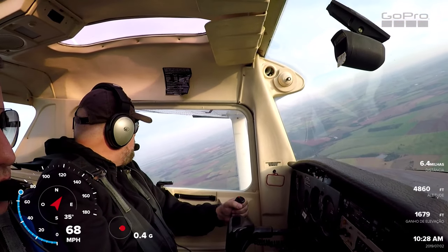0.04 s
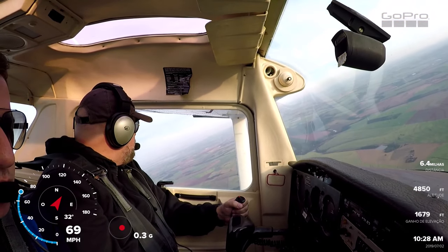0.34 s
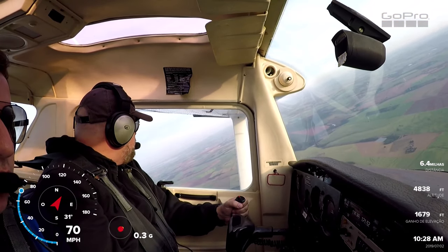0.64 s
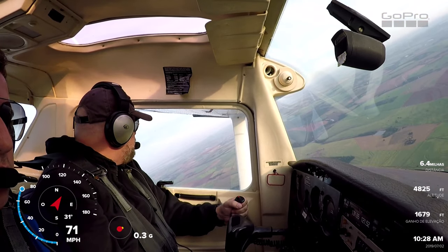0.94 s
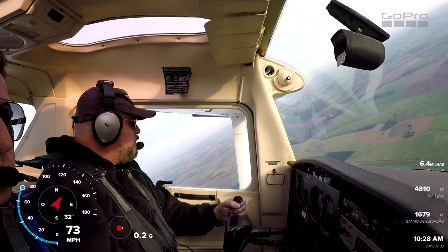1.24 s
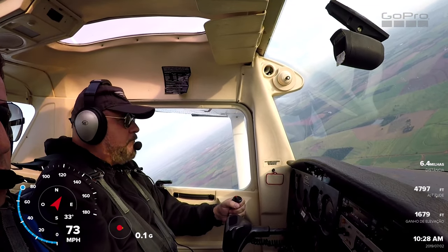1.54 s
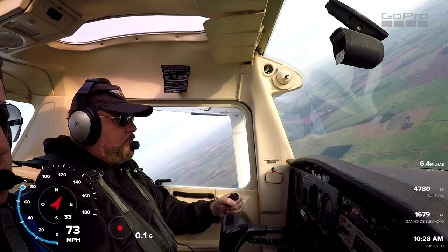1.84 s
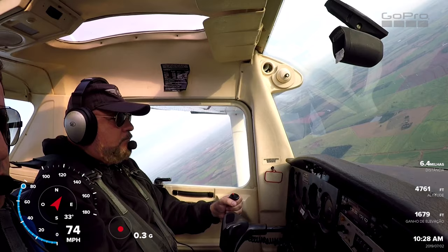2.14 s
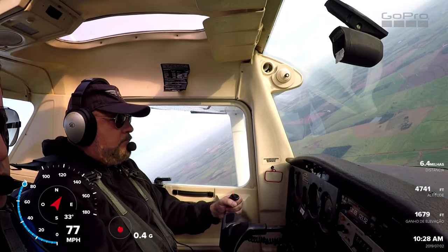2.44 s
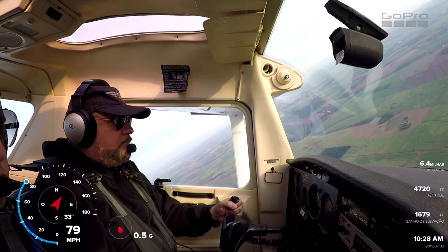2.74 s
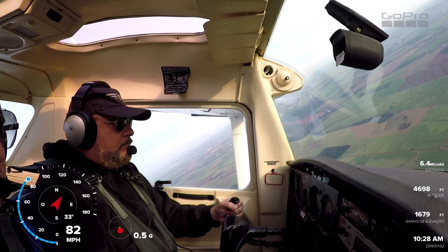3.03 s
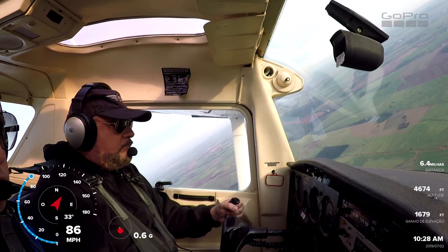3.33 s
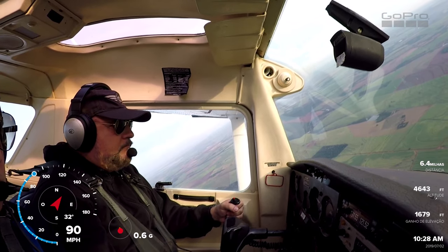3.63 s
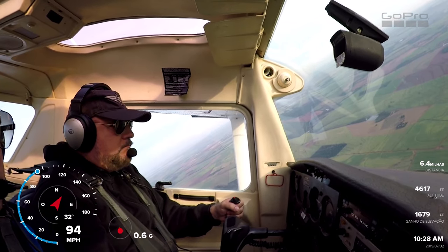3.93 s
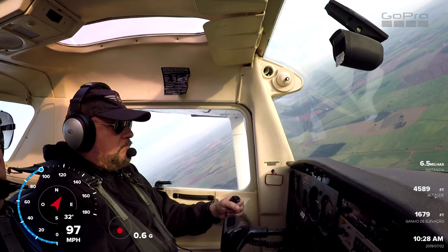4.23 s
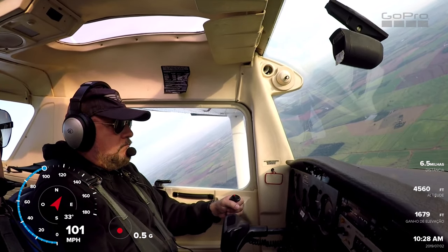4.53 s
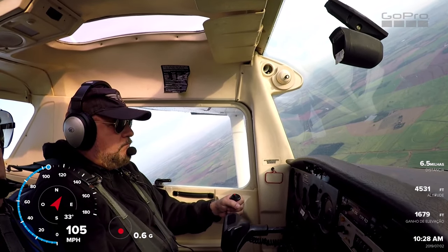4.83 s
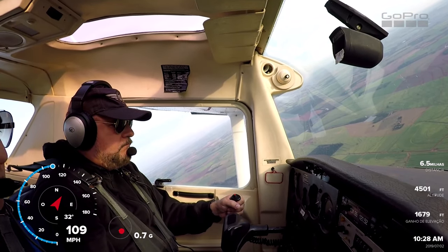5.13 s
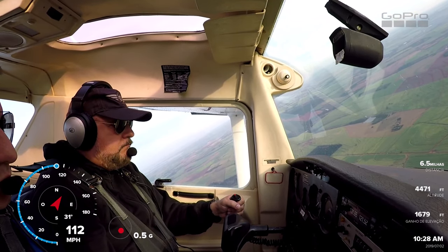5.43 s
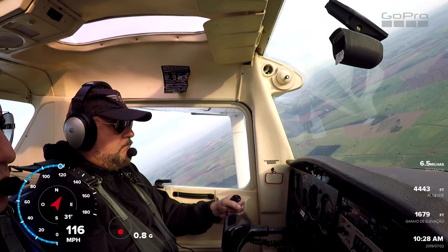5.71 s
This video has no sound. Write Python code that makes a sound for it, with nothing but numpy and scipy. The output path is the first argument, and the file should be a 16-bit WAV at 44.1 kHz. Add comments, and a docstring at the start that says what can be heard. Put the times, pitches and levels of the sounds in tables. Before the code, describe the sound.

Inside a light aircraft gathering speed, a low propeller drone rises into a deep boom amid swelling wind roar and hiss.

```python
"""A propeller drone in rushing air, from inside a small plane's cabin as it gathers speed in a descent.
The airflow spins the propeller faster, so the drone slides out of one cabin resonance into a deeper boom.
Air buffets the hull, roars over the windscreen and hisses through the door seals, harder as speed grows.
Gain control on the camera microphone holds the level, so the rushing air ducks while the boom peaks."""
import sys
import numpy as np
from scipy import signal
from scipy.fft import rfft, irfft, next_fast_len
from scipy.io import wavfile
from scipy.ndimage import uniform_filter1d, minimum_filter1d

SR = 44100
rng = np.random.default_rng(int(sys.argv[2]) if len(sys.argv) > 2 else 0)


def store_wav(level_fs):
    """Save 16-bit WAV to argv[1]."""
    pcm = np.round(np.clip(np.atleast_2d(level_fs), -1, 1) * 32767)
    wavfile.write(sys.argv[1], SR, pcm.T.astype(np.int16))


N = 263277


def from_db(db):
    """Decibels to gain."""
    return 10 ** (np.asarray(db) / 20)


def bell(hz, centre_hz, width_hz):
    """Bell-shaped curve of a resonance, 1 on top."""
    return 1 / (1 + ((hz - centre_hz ** 2 / hz) / width_hz) ** 2)


def swell(peak_s, spread_s):
    """A smooth rise and fall in time, 1 at its peak."""
    return np.exp(-.5 * ((np.arange(N) / SR - peak_s) / spread_s) ** 2)


def noise(gain_at):
    """Noise of rms 1, coloured by a gain that depends on frequency."""
    size = next_fast_len(N)
    hz = np.maximum(np.fft.rfftfreq(size, 1 / SR), 1)
    coloured = irfft(rfft(rng.standard_normal(size)) * gain_at(hz), size)[:N]
    return coloured / np.sqrt(np.mean(coloured ** 2) + 1e-20)


def drift(rate_hz):
    """A slow random wander of rms 1."""
    return noise(lambda hz: 1 / (1 + (hz / rate_hz) ** 2) ** 2)


def throb(blade_phase, depth):
    """The level swells once per shaft turn, which is every second blade pass."""
    return 1 + depth * np.cos(blade_phase / 2)


def drone(blade_hz, blade_phase, effort):
    """Blade passes and exhaust pulses: each tone swells and fades as it crosses the cabin's resonances."""
    # tones of propeller and engine: multiple of the blade rate, relative level/dB
    tones = [(1, 1), (2, -9.5), (3, -19.5), (5, -25.5), (11, -29.5)]
    # the cabin's peaks and notch at the microphone: f/Hz, width/Hz, gain/dB
    cabin = [(58.5, 1.3, 3), (69, 4.9, 11), (118.1, 28.6, 18), (138.4, 6, -12.5)]
    out = 0
    for multiple, tone_db in tones:
        cabin_db = sum(db * bell(multiple * blade_hz, centre, width) for centre, width, db in cabin)
        waver_db = 0.15 * drift(rate_hz=9.2)
        tone = np.sin(multiple * blade_phase + rng.uniform(0, 2 * np.pi))
        out += from_db(tone_db + cabin_db + waver_db) * tone
    return np.sqrt(2) * from_db(-27.5 + 6 * effort) * out


def air(spectrum):
    """Turbulence with a broad spectrum, heard through the cabin's cavities."""
    # cavity resonances: f/Hz, width/Hz, gain/dB
    cavities = [(361.5, 46, 4.5), (508, 41, 3), (563, 34, 2.5), (762, 51, -1.5), (825, 30, 5.5),
                (950, 62, 1.5), (4640, 180, 1.5), (5270, 57, 1), (6260, 220, 2), (10200, 300, 6)]
    points_hz, points_db = np.transpose(spectrum)

    def colour(hz):
        broad_db = np.interp(np.log(hz), np.log(points_hz), points_db, left=-90, right=-90)
        cavity_db = sum(db * bell(hz, centre, width) for centre, width, db in cavities)
        return from_db(broad_db + cavity_db)
    return noise(colour)


def buffeting(effort):
    """Air buffets the hull, and the cabin air booms around the microphone."""
    # spectrum of the buffeting: f/Hz, level/dB
    rumble = [(8, -19.5), (16, -6), (40, 0), (85, -1.5), (115, -0.5), (135, -9), (155, -15), (260, -26.5),
              (500, -63)]
    boom = from_db(-10) * noise(lambda hz: bell(hz, centre_hz=69.1, width_hz=4.4))
    return from_db(-26.5 + 7.5 * effort) * (air(rumble) + boom)


def roof_panels(blade_phase, effort):
    """Buffeting sets the panels overhead drumming."""
    # panel resonances: f/Hz, width/Hz, relative level/dB
    modes = [(160, 65, -6), (199.7, 29, 3.5), (227.8, 15.6, -2.5)]
    drumming = noise(lambda hz: sum(from_db(db) * bell(hz, centre, width) for centre, width, db in modes))
    return from_db(-37 + 17.5 * effort) * drumming * throb(blade_phase, depth=0.072)


def rush(slow, fast, pace):
    """The airflow's colour passes from the slow spectrum to the fast as pace goes from 0 to 1."""
    return np.sqrt(1 - pace) * air(slow) + np.sqrt(pace) * air(fast)


def windscreen_roar(blade_phase, pace, effort):
    """Air roars over the windscreen, throbbing lightly with the shaft."""
    # spectra of the roar at the lowest and highest speed: f/Hz, level/dB
    slow = [(180, 2.5), (270, -7), (320, -7), (400, -2.5), (520, 0), (650, -0.5), (760, -4), (950, -1),
            (1150, -3.5), (1450, -9.5), (1700, -16.5), (2300, -19.5), (3200, -27), (5000, -47)]
    fast = [(180, -1.5), (270, -2.5), (320, -7), (400, -1.5), (520, -2.5), (700, -1.5), (1000, -3.5),
            (1380, -5.5), (1580, -11.5), (2000, -12), (2500, -20), (3200, -28.5), (5000, -43.5)]
    gain = from_db(-39 + 18 * effort + 0.29 * drift(rate_hz=18))
    return gain * rush(slow, fast, pace) * throb(blade_phase, depth=0.055)


def seal_hiss(pace, effort):
    """Air hisses in through the door seals."""
    # spectra of the hiss at the lowest and highest speed: f/Hz, level/dB
    slow = [(2800, -26), (3500, -17), (3850, -12), (4200, -4), (4600, 0.5), (5500, -2.5), (6300, -0.5),
            (6900, -14), (7600, -17), (8700, -20.5), (10200, -34.5), (11200, -44.5)]
    fast = [(2800, -26.5), (3500, -23), (4100, -13.5), (4700, -5), (5500, -0.5), (6300, -1), (7000, -12.5),
            (7600, -15.5), (8600, -20.5), (10200, -30.5), (11000, -37.5), (13800, -45), (15000, -47)]
    gain = from_db(-47.5 + 25 * effort + 0.29 * drift(rate_hz=25))
    return gain * rush(slow, fast, pace)


def thin_hiss(effort):
    """A faint, thin hiss lies on top of the rushing air."""
    # spectrum of the highest hiss: f/Hz, level/dB
    spectrum = [(10000, -19), (11200, -9.5), (12500, 0), (13700, -3), (15000, -13), (17000, -33)]
    return from_db(-71 + 2 * effort) * air(spectrum)


def howls(widening=1.8):
    """Air blows across gaps in the cabin, and hollow notes swell and fade."""
    # gap resonances: t/s, spread/s, f/Hz, width before widening/Hz, level/dB
    notes = [(1, 0.46, 986, 40, -43), (2.1, 0.42, 1572, 35.2, -49.5), (2.4, 0.21, 566, 45.3, -36.5),
             (2.85, 0.38, 960, 70, -40), (3.2, 0.26, 487, 50.3, -33.5), (5.28, 0.12, 500, 40, -31)]
    out = 0
    for peak_s, spread_s, centre, width, db in notes:
        note = noise(lambda hz: bell(hz, centre, widening * width))
        out += from_db(db) * swell(peak_s, spread_s) * note
    return out


def level_swings():
    """Brief swells and dips in the loudness of the buffeting, the panels and the slipstream."""
    # swings of level: t/s, spread/s, buffeting/dB, panels/dB, slipstream/dB
    swings = [(.1, 0.43, 6, -2.5, 0.8), (.85, 0.15, 1, -4.5, 0.2), (2.3, 0.41, -1.5, 1, 1.24),
              (3.8, 0.13, 2, -4, 0.3), (4.25, 0.14, 0.5, 4.5, 0.2)]
    return from_db(sum(np.outer(db, swell(peak_s, spread_s)) for peak_s, spread_s, *db in swings))


def scene():
    """One microphone in the cabin: airspeed drives the propeller and the strength of the wind."""
    # propeller speed: t/s, blade-pass f/Hz
    speed = [(0.0, 56.5), (1.1, 58.4), (2.9, 63.9), (3.45, 68.0), (5.0, 73.2), (5.97, 79.9)]
    blade_hz = np.interp(np.arange(N) / SR, *np.transpose(speed))
    blade_phase = 2 * np.pi * np.cumsum(blade_hz) / SR
    pace = (blade_hz - blade_hz.min()) / np.ptp(blade_hz)  # share of the speed gained, 0 to 1
    effort = np.sqrt(pace)  # levels in dB follow base + rise * effort
    buffet_swing, panel_swing, slipstream_swing = level_swings()
    hull = buffet_swing * buffeting(effort) + panel_swing * roof_panels(blade_phase, effort)
    slipstream = windscreen_roar(blade_phase, pace, effort) + seal_hiss(pace, effort)
    slipstream += howls() + thin_hiss(effort)
    return (drone(blade_hz, blade_phase, effort) + hull + slipstream_swing * slipstream)[None]


def gain_control(x, hold_db, lag_s):
    """The gain sinks by as much as the smoothed level exceeds the level to hold."""
    pole = np.exp(-1 / (lag_s * SR))
    power = signal.lfilter([(1 - pole) ** 2], [1, -2 * pole, pole * pole], x ** 2)
    return x / np.sqrt(np.maximum(power / from_db(hold_db) ** 2, 1))


def limiter(x, ceiling_db, release_db_per_s):
    """The gain dips just ahead of each peak over the ceiling and then recovers."""
    over_db = np.maximum(20 * np.log10(np.abs(x) + 1e-9) - ceiling_db, 0)
    ramp = release_db_per_s * np.arange(N) / SR
    gain_db = ramp - np.maximum.accumulate(over_db + ramp, axis=-1)
    return x * from_db(uniform_filter1d(minimum_filter1d(gain_db, size=300), size=300))


def record(dry):
    """The camera holds the microphone's level steady, limits the bass on its own and cuts the top."""
    steady = gain_control(dry, hold_db=-18.5, lag_s=0.11)
    bass = signal.sosfiltfilt(signal.butter(2, 280, fs=SR, output="sos"), steady)
    limited_bass = limiter(from_db(0.7) * bass, ceiling_db=-13.0, release_db_per_s=112)
    top_cut = signal.ellip(10, .1, 80, 15100, fs=SR, output="sos")
    return signal.sosfilt(top_cut, steady - bass + limited_bass)


dry = scene()
out = record(dry)
store_wav(out)
```